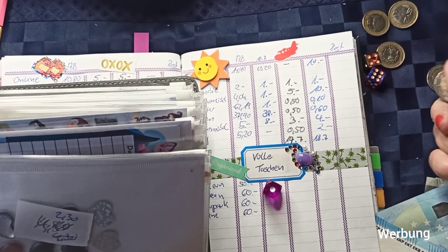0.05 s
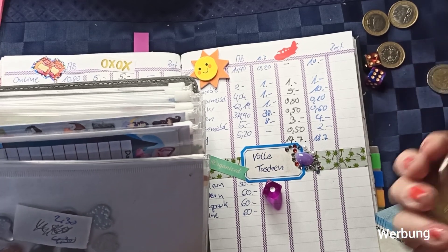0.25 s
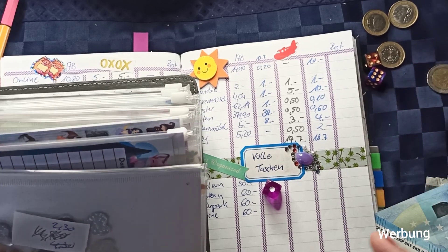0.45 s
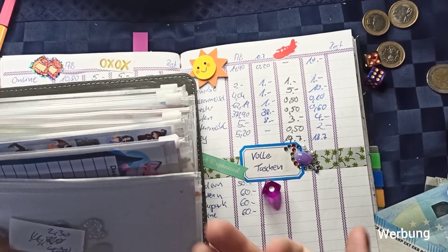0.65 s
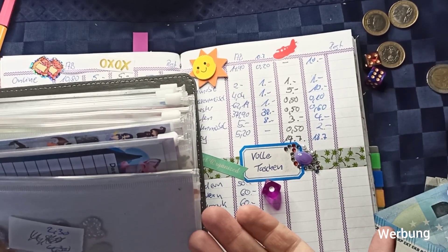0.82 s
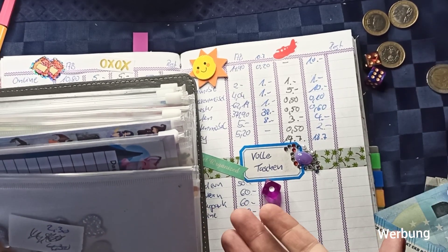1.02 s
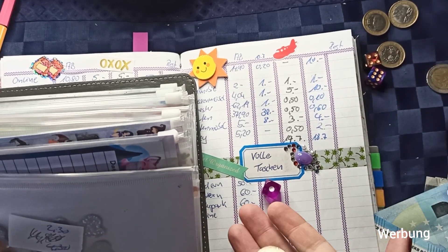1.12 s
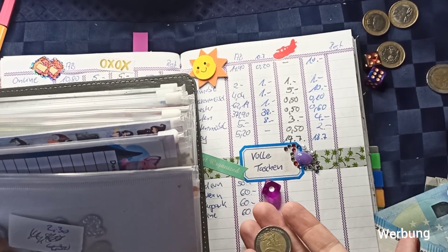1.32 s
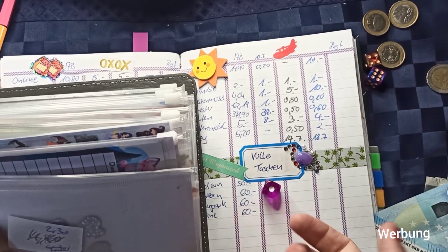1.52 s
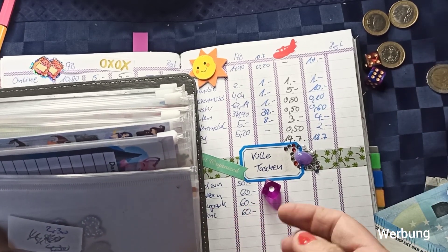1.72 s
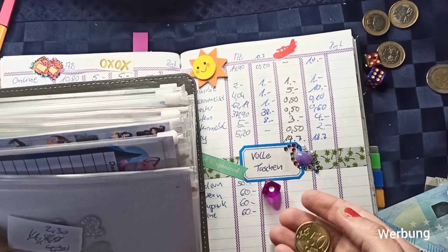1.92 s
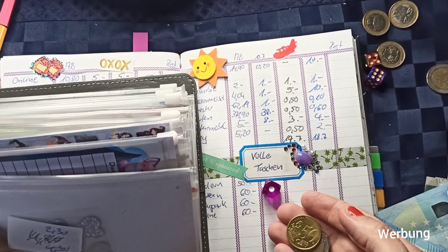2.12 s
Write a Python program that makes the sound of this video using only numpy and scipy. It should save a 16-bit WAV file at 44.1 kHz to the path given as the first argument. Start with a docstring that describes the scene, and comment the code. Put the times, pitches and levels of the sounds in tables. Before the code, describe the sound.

Coins clink and scrape softly as a hand gathers them, then drop together into the palm.

```python
"""Coins clink as a hand picks them off a cloth-covered table and shuffles them above an open notebook.
Each contact is a sharp, close click; a loose coin also rings near 13 kHz until the fingers damp it.
Between clinks the milled edges scrape over each other, and at the end the coins drop together in the
palm. Underneath are soft knocks and the brush of hand and coin on cloth and paper.
A small, quiet room answers."""
import sys
import numpy as np
from scipy import signal
from scipy.fft import rfft, irfft
from scipy.io import wavfile

SR = 44100
rng = np.random.default_rng(int(sys.argv[2]) if len(sys.argv) > 2 else 0)


def wav_record(signal):
    """Record a signal, one row per channel, as 16-bit PCM in the file named by sys.argv[1]."""
    frames = np.transpose(np.atleast_2d(signal))
    bounded = np.clip(frames, -1, 1)
    # unit amplitude maps onto the largest positive 16-bit level
    quanta = np.round(bounded * 32767).astype(np.int16)
    wavfile.write(sys.argv[1], SR, quanta)


N = 94815
TIME, FREQS = np.arange(N) / SR, np.fft.rfftfreq(N, 1 / SR)


def amp(db):
    """Decibels to gain."""
    return 10 ** (np.asarray(db) / 20)


def unit_rms(x):
    """Scales to an rms of one."""
    return x / np.sqrt(np.mean(x ** 2) + 1e-20)


def at_hz(points, hz):
    """A curve's value on a log-frequency axis."""
    f, value = np.transpose(points)
    return np.interp(np.log(hz + 1), np.log(np.sort(f) + 1), value)


def at_time(curve, s):
    """A control's value at a time."""
    return np.interp(s, *np.transpose(curve))


def add(mix, start, sound):
    """Mixes a sound in at a time in seconds."""
    part = mix[:, max(round(start * SR), 0):][:, :sound.shape[1]]
    part += sound[:, :part.shape[1]]


def panned(side_db):
    """Left and right gains, side_db apart."""
    return amp(np.array([[side_db], [-side_db]]) / 2)


def response(colour, size=2048):
    """Minimum-phase impulse response of a colour, with an energy of one."""
    cepstrum = irfft(np.log(amp(at_hz(colour, np.fft.rfftfreq(size, 1 / SR)))))
    cepstrum[1:size // 2] *= 2
    cepstrum[size // 2 + 1:] = 0
    impulse = irfft(np.exp(rfft(cepstrum)))[:size // 2]
    return impulse / np.linalg.norm(impulse)


def through(x, impulse):
    """Filters a stereo signal and keeps its length."""
    return signal.fftconvolve(x, np.atleast_2d(impulse), axes=1)[:, :x.shape[1]]


def noise(colour, correlation):
    """Coloured stereo noise, partly alike in both ears."""
    left, other = rng.standard_normal((2, N))
    right = correlation * left + np.sqrt(1 - correlation ** 2) * other
    return unit_rms(irfft(rfft([left, right]) * amp(at_hz(colour, FREQS)), N))


def ringing(modes, t60, t):
    """Decaying sines from a table of modes."""
    return sum(amp(db) * np.sin(2 * np.pi * hz * t) for hz, db in modes) * np.exp(-np.log(1000) * t / t60)


# Colour of the room tone. Each row: frequency in Hz, level in dB.
AIR_COLOUR = [(35, -17), (60, -3.5), (121, -3), (448, -14), (767, -20), (1100, -30.5), (1700, -24.5),
              (4120, -35.5), (5590, -44.5), (8120, -45), (16000, -38)]

def room_air():
    """A steady, low bed of room air."""
    return amp(-62) * noise(AIR_COLOUR, correlation=0.1)


# Colour of skin on cloth and paper. Each row: frequency in Hz, level in dB.
BRUSH_COLOUR = [(60, -16), (200, 6), (500, 1.5), (1200, -3), (2400, -13.5), (4200, -9.5), (5200, -16.5),
                (7000, -9), (8300, -13), (9500, -38), (13000, -12.5), (16000, -16.5)]
# Fader ride of the brush. Each row: time in seconds, level in dB.
BRUSH_RIDE = [(0, -60), (.1, -64), (.17, -61), (.36, -61), (.57, -57), (.75, -63), (1.1, -62.5),
              (1.3, -65.5), (2.15, -65)]

def hand_brush():
    """The hand brushes faintly over cloth and paper."""
    return noise(BRUSH_COLOUR, correlation=0.19) * amp(at_time(BRUSH_RIDE, TIME))


# Strokes of a dragged coin. Each row: start and length in seconds, centre and width in Hz, level in dB.
SLIDES = [(0, 0.22, 990, 630, -63), (.14, 0.03, 3300, 900, -62), (.17, 0.44, 4120, 1200, -66.5),
          (0.11, 0.35, 6940, 1600, -60.5)]

def coin_slides():
    """A coin drags over cloth and past paper: grainy friction that swells and fades with each stroke."""
    out = np.zeros((2, N))
    for start, length, centre_hz, width_hz, db in SLIDES:
        grains = rng.standard_normal((2, N)) * rng.exponential(1, (2, N))
        band = 1 / (1 + (2 * (FREQS - centre_hz) / width_hz) ** 2)
        rub = unit_rms(irfft(rfft(grains) * band, N))
        stroke = np.sqrt(np.hanning(round(length * SR)))
        add(out, start, amp(db) * rub[:, :len(stroke)] * stroke)
    return out


# Colours of the sharp click, dull clack and high sizzle. Each row: frequency in Hz, level in dB.
CLICK_COLOUR = [(800, -54.5), (4000, -32.5), (5700, -18.5), (6400, 9), (6900, 8.5), (7600, 5), (8300, -7),
                (9100, -36), (11000, -25), (16000, -56)]
CLACK_COLOUR = [(1000, -33.5), (2400, -18.5), (3500, -6), (4600, -0.5), (5300, -3.5), (6200, 13.5),
                (9000, -21.5)]
SIZZLE_COLOUR = [(2000, -50), (8000, -16.5), (9700, -16), (10300, -10.5), (11200, -32.5), (11800, 1.5),
                 (12600, -9.5), (13200, 6), (14000, -3), (15600, -3.5), (16300, -34.5)]
# Brief tones inside the click and the clack. Each row: frequency in Hz, relative level in dB.
CLICK_MODES = [(6606, -24), (6835, -22), (7150, -26), (7620, -22)]
CLACK_MODES = [(3413, -0.5), (4060, -1.5), (4700, 7.5), (5640, -1)]
# Coins pressed together clack harder. Each row: time in seconds, level against the click in dB.
CLACK_RIDE = [(.25, -19), (.41, -3), (.6, -6.5), (.64, -12), (1.07, -4), (1.53, -12), (1.75, -8),
              (1.85, -8), (1.95, -15)]

def metal(start, click_db, sizzle_db):
    """A coin's answer to one impulse: click, sizzle and a clack whose modes shift with the grip."""
    t = np.arange(1024) / SR
    click, clack, sizzle = map(response, (CLICK_COLOUR, CLACK_COLOUR, SIZZLE_COLOUR))
    gripped = [(hz * (1 + .08 * rng.uniform(-1.1, 1)), db) for hz, db in CLACK_MODES]
    clack = clack + abs(clack).max() * amp(-23) * ringing(gripped, t60=.014, t=t)
    click = click + abs(click).max() * amp(-19) * ringing(CLICK_MODES, t60=.05, t=t)
    body = click + amp(at_time(CLACK_RIDE, start)) * clack
    return panned(side_db=3.5) * amp(click_db) * body + amp(sizzle_db) * sizzle


def contact(start, click_db, sizzle_db, scatter_db=-7.5, scatter_s=0.0016, size=1536):
    """One hit of metal on metal, scattering briefly off the fingers and the page."""
    t = np.arange(size) / SR
    scatter = rng.standard_normal((2, size)) * (t / scatter_s) ** .5 * np.exp(-t / scatter_s)
    hit = (t == 0) + amp(scatter_db) * unit_rms(scatter) / np.sqrt(size)
    return through(hit, metal(start, click_db, sizzle_db)) / abs(response(CLICK_COLOUR)).max()


RING_HZ, RING_RISE_S = 13058, 0.00047
# A loose coin's two close modes. Each row: ratio to the main pitch, relative level in dB.
RING_MODES = [(1, 0), (1.009, -16)]
# Hits that ring. Each row: start in seconds, click, sizzle and ring levels in dB,
# detune from RING_HZ in Hz, seconds for the ring to fall 60 dB.
CLINKS = [(0.2368, -13.5, -32, -15, 1, 0.034), (0.3002, -29, -52, -55, 183, 0.014),
          (0.4199, -27, -42, -43, -17, 0.034), (0.4465, -18.5, -31, -31, 66, 0.018),
          (0.4545, -29, -46, -18, 112, 0.02), (0.471, -30, -48, -33, 270, 0.03),
          (0.515, -33, -52, -41, 66, 0.036), (0.602, -36, -43, -28, 370, 0.0089),
          (0.635, -30, -22, -31, 145, 0.017), (0.684, -44, -30, -39, 143, 0.043),
          (0.935, -39.5, -44, -56, 63, 0.017), (0.992, -43, -44, -59, 640, 0.013),
          (1.075, -28.5, -43, -41, 5, 0.026), (1.5248, -12.5, -22, -28, 37, 0.026),
          (1.8416, -9.5, -14, -16, 165, .013), (1.8493, -24, -17, -8, 200, .009),
          (1.858, -25.5, -28, 1, 74, 0.013), (1.8739, -30, -22.5, -26, 96, 0.028)]

def clinks():
    """A loose coin clicks and rings, dying ever faster as the fingers close."""
    out, t = np.zeros((2, N)), np.arange(8192) / SR
    for start, click_db, sizzle_db, ring_db, detune_hz, t60 in CLINKS:
        tilt = rng.standard_normal((2, 1)) / 2  # a tilted coin reaches each microphone in its own phase
        phase = 2 * np.pi * (RING_HZ + detune_hz) * t
        ring = sum(amp(db) * np.sin(phase * ratio + tilt) for ratio, db in RING_MODES)
        damping = np.exp(-np.log(1000) * (t / t60) ** 2)
        swell = 1 - np.exp(-t / (RING_RISE_S * amp(ring_db - click_db)))  # slower after a glancing touch
        add(out, start, amp(ring_db) * ring * damping * swell)
        add(out, start, contact(start, click_db, sizzle_db))
    return out


# Tight, dry hits. Each row: start in seconds, click level in dB, sizzle level in dB.
TICKS = [(0.2473, -21.5, -37), (0.252, -25, -34), (0.413, -29.5, -46), (0.4296, -31, -82),
         (.4410, -25, -36), (0.4503, -27, -35), (.6000, -24.5, -36), (0.6374, -36, -29), (.6583, -38, -35),
         (0.678, -39, -42), (.9255, -54, -58), (1.0798, -38, -35), (1.4214, -42, -46), (1.5285, -15, -36),
         (1.5308, -33.5, -25), (1.7027, -40, -54), (1.7263, -35, -41), (1.7766, -36, -63),
         (1.8023, -32.5, -60), (1.8434, -14.5, -22), (1.8517, -14.5, -13), (1.8541, -15, -30),
         (1.8618, -18, -30), (1.8646, -20.5, -28), (1.8670, -19, -27), (1.8721, -17.5, -29),
         (1.8761, -19, -29), (1.887, -32, -31), (1.8958, -22, -32.5), (1.9332, -30, -34),
         (2.0144, -38, -47.5)]

def ticks():
    """Damped contacts and rebounds click without the high ring."""
    out = np.zeros((2, N))
    for start, click_db, sizzle_db in TICKS:
        add(out, start, contact(start, click_db, sizzle_db))
    return out


# Colour of a rubbed coin's ring. Each row: frequency in Hz, level in dB.
RUBBED_COLOUR = [(5000, -78), (9900, -19), (10300, -16), (10800, -36), (12700, -32), (13050, -3),
                 (13280, 13.5), (13650, -44), (16000, -62)]
# Coin sliding on coin. Each row: start and length in seconds, opening levels of click, sizzle and
# ring in dB, level change across the scrape in dB.
SCRAPES = [(0.446, 0.016, -32.5, -37, -31.5, -7), (0.466, 0.041, -42, -52, -46, -7.5),
           (0.514, 0.0099, -39, -55, -41.5, -3), (0.595, 0.01, -40, -47, -38, -9.5),
           (0.629, 0.011, -30.5, -37, -38, 0), (0.659, 0.039, -44, -44, -54, 1.5),
           (0.691, 0.046, -55.5, -58, -57, -4.5), (1.021, 0.05, -54.5, -56, -58, 8.5),
           (1.079, 0.056, -41, -54, -43.5, -8.5), (1.697, 0.023, -48, -61, -60, -1),
           (1.716, 0.021, -34, -52, -52.5, -5.5), (1.74, 0.019, -42.5, -54, -56, -2.5),
           (1.755, 0.11, -62.5, -73, -67.5, 15.5), (1.851, 0.026, -37, -29, -28.5, -9),
           (1.879, 0.064, -54, -43, -40, -16)]

def scrapes(slips_per_s=550, slip_spread_db=5, rub_db=-8, edge_s=.0025, size=6000):
    """Milled edges catch and slip: a quick train of uneven clicks drives the metal."""
    out, t = np.zeros((2, N)), np.arange(size) / SR
    for start, length, click_db, sizzle_db, ring_db, change_db in SCRAPES:
        gaps = rng.uniform(.2, 1.8, size) / slips_per_s
        pulses = np.histogram(np.cumsum(gaps), size, (0, size / SR))[0]
        slips = pulses * amp(slip_spread_db * rng.uniform(-0.1, 1, size))
        # Each slip has a part common to both microphones and a part that differs.
        stereo_slips = slips * (rng.choice([-1, 1], size) + rng.standard_normal((2, size)))
        drive = unit_rms(stereo_slips) + amp(rub_db) * rng.standard_normal((2, size))
        drive /= np.sqrt(np.mean(drive[:, t < length] ** 2))
        gate = np.clip(np.minimum(t, length - t) / edge_s, 0, 1)
        ramp = amp(change_db * np.minimum(t / length, 1))
        coin = metal(start, click_db, sizzle_db) + amp(ring_db) * response(RUBBED_COLOUR)
        add(out, start, through(drive * gate * ramp, coin))
    return out


# Pings of a second coin. Each row: start in seconds, level in dB, seconds to fall 60 dB.
LOW_RINGS = [(.447, -44, .05), (.635, -40, .05), (1.076, -44, .17), (1.8432, -29, .04)]

def low_rings(pitch_hz=10300):
    """A second coin rings lower when its edge is caught."""
    out, t = np.zeros((2, N)), np.arange(8192) / SR
    for start, db, t60 in LOW_RINGS:
        envelope = np.exp(-np.log(1000) * t / t60) - np.exp(-t / RING_RISE_S)
        add(out, start, amp(db) * (envelope * np.sin(2 * np.pi * pitch_hz * t))[None])
    return out


# Soft bumps. Each row: start in seconds, level in dB, low-pass cutoff in Hz, decay in seconds.
KNOCKS = [(.573, -54, 280, 0.0048), (1.4195, -47, 3580, 0.0012), (1.525, -52, 3600, 0.0033),
          (1.7230, -57, 3400, 0.0097), (1.8400, -49, 443, 0.008)]

def knocks(size=4096):
    """Knocks against the hand and the notebook: dull puffs without any ring."""
    out, t = np.zeros((2, N)), np.arange(size) / SR
    for start, db, cutoff_hz, decay in KNOCKS:
        push = rng.standard_normal(size) + rng.standard_normal((2, size))
        puff = unit_rms(signal.lfilter(*signal.butter(3, cutoff_hz, fs=SR), push))
        envelope = (t / decay) * np.exp(1 - t / decay)
        add(out, start, amp(db) * puff * envelope)
    return out


# The hand's place between the microphones. Each row: time in seconds, left over right in dB.
HAND_PAN = [(.25, 5.5), (.42, 4.5), (.46, -1.5), (.6, 2.5), (.68, -3), (1.08, 0), (1.53, 2), (1.73, 2),
            (1.85, -1), (2.1, 5.5)]

def microphones(x, right_lag_s=.000216):
    """The pan follows the hand; the right microphone hears it a steady instant later."""
    lag = np.exp(-2j * np.pi * FREQS * np.array([[0], [right_lag_s]]))
    side_db = at_time(HAND_PAN, TIME)
    return irfft(rfft(x) * lag, N) * amp(np.array([side_db, -side_db]) / 2)


# Decay of the small room. Each row: frequency in Hz, seconds to fall 60 dB.
ROOM_T60 = [(300, 0.084), (4000, 0.32), (7000, 0.16), (13000, 0.17), (16000, 0.185)]

def room(x, tail_db=-13, predelay_s=0.0093, early_db=-22.5, early_decay_s=0.004, size=16384):
    """Early echoes from the table, then a short tail that lingers longest near 4 kHz."""
    t = np.arange(size) / SR
    hz, age, spectrum = signal.stft(rng.standard_normal((2, size)), SR, nperseg=256)
    decay = np.exp(-np.log(1000) * age / at_hz(ROOM_T60, hz)[:, None])
    tail = signal.istft(spectrum * decay, SR)[1][:, :size]
    tail = unit_rms(tail * np.clip(t / predelay_s - 1, 0, 1))
    spikes = rng.standard_normal((2, size)) ** 3
    early = unit_rms(spikes * np.exp(-t / early_decay_s) * (t > .002))
    return through(x, (amp(tail_db) * tail + amp(early_db) * early) / np.sqrt(size))


def scene():
    """Close coins and their room reverb over a bed of hand brush and air."""
    coins = clinks() + ticks() + low_rings() + scrapes() + knocks() + coin_slides()
    reverb = room(coins)
    bed = panned(side_db=1.2) * (hand_brush() + room_air())
    return microphones(coins) + reverb + bed


def record(dry, low_cut_hz=62, high_cut_hz=16300):
    """The recorder's low cut and band limit."""
    thinned = signal.sosfilt(signal.butter(4, low_cut_hz, "high", fs=SR, output="sos"), dry)
    band_limit = signal.firwin(255, high_cut_hz, window=("kaiser", 8), fs=SR)
    return signal.oaconvolve(thinned, band_limit[None], "same")


dry = scene()
out = record(dry)
wav_record(out)
```